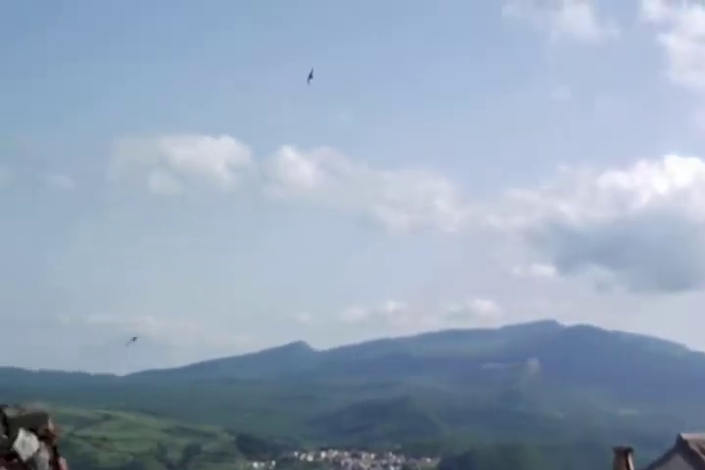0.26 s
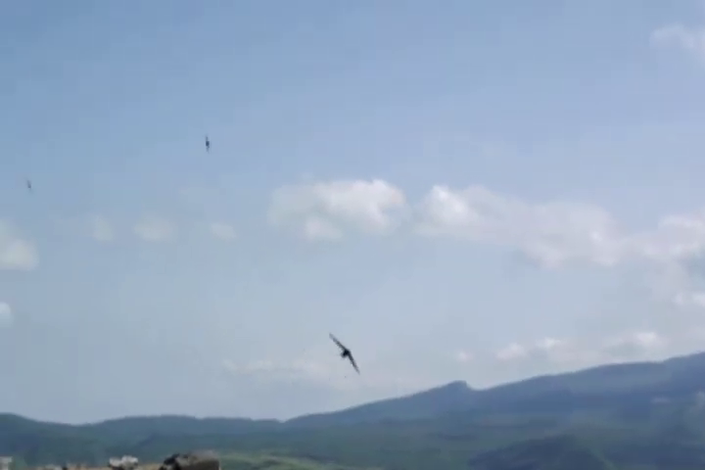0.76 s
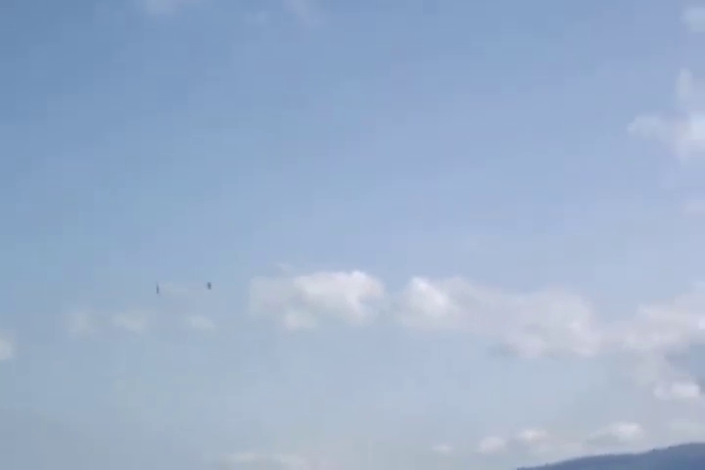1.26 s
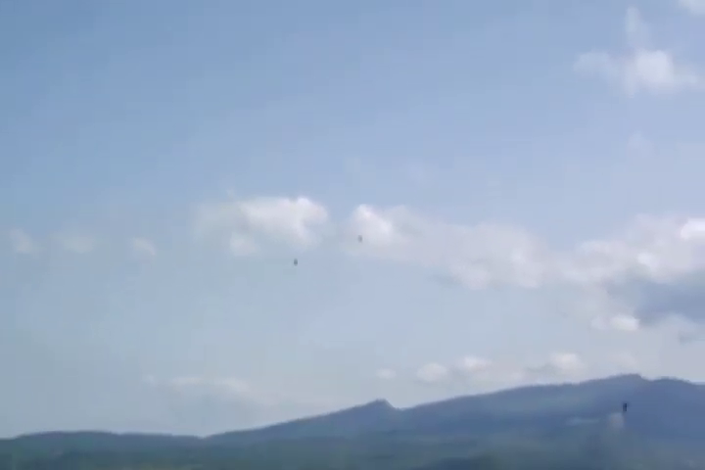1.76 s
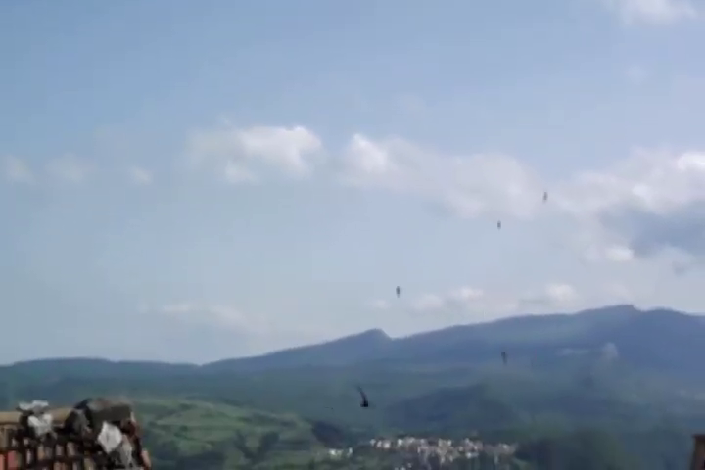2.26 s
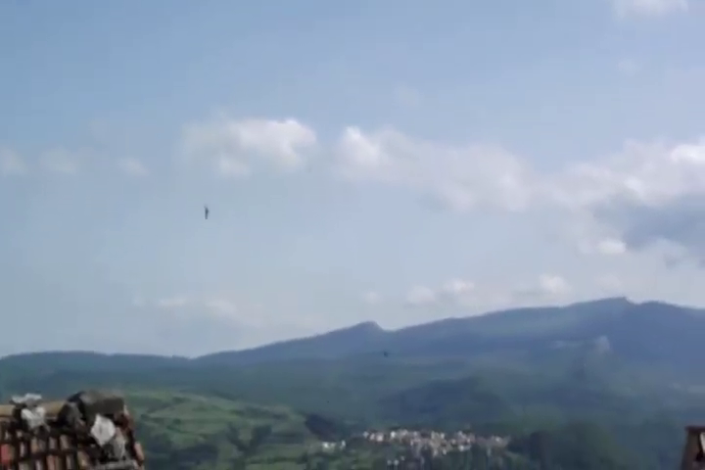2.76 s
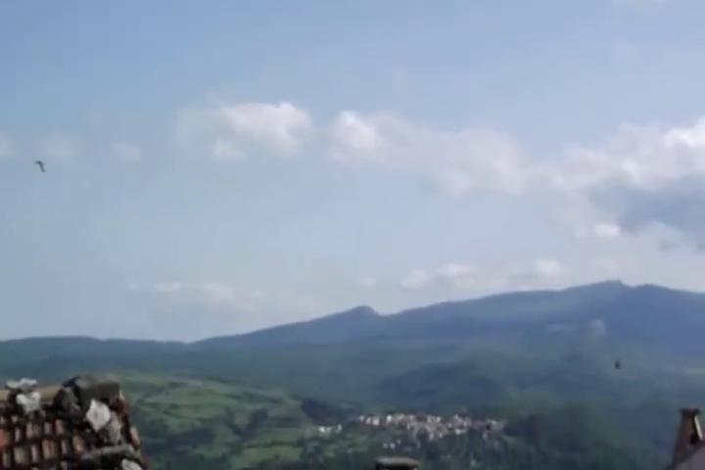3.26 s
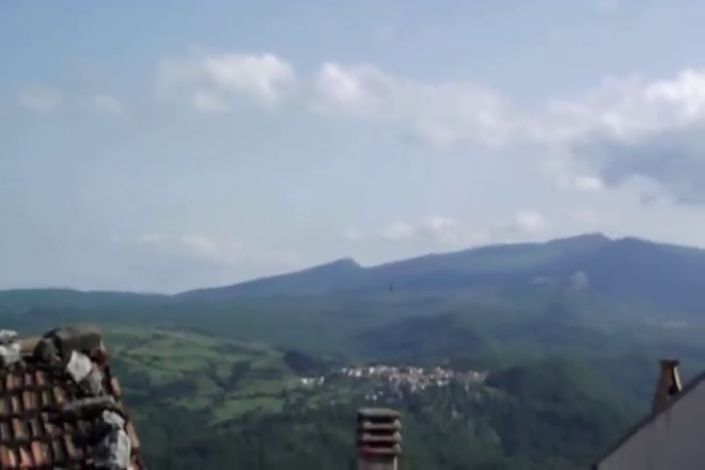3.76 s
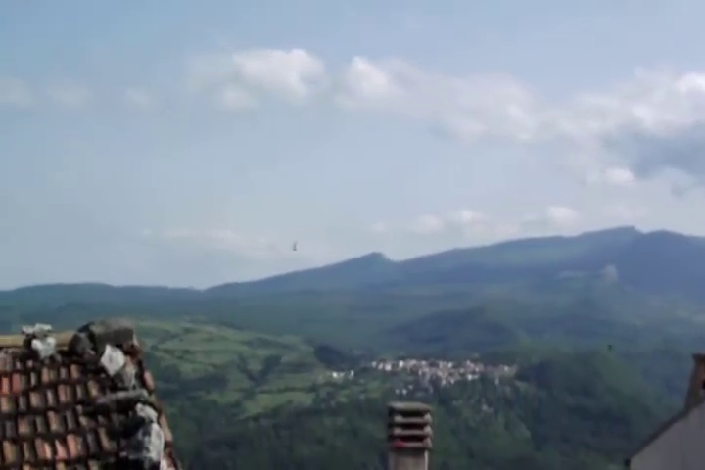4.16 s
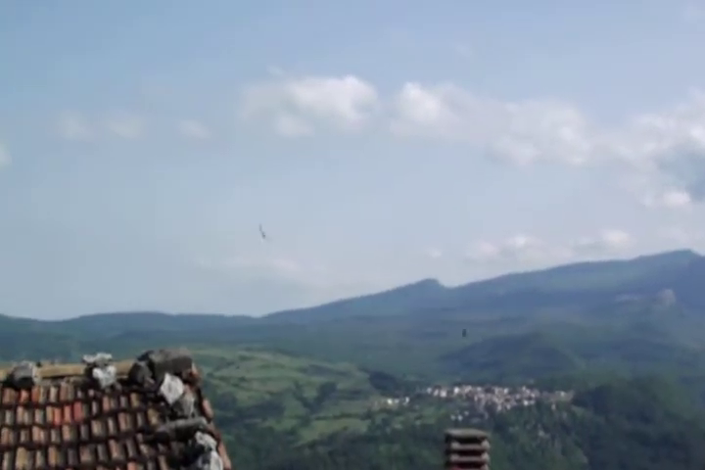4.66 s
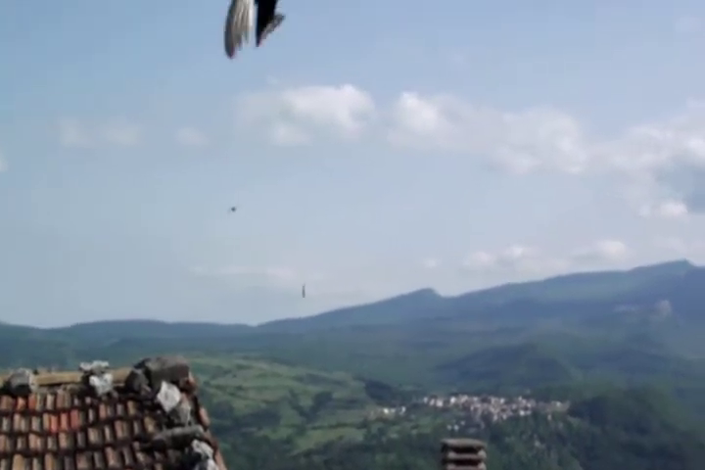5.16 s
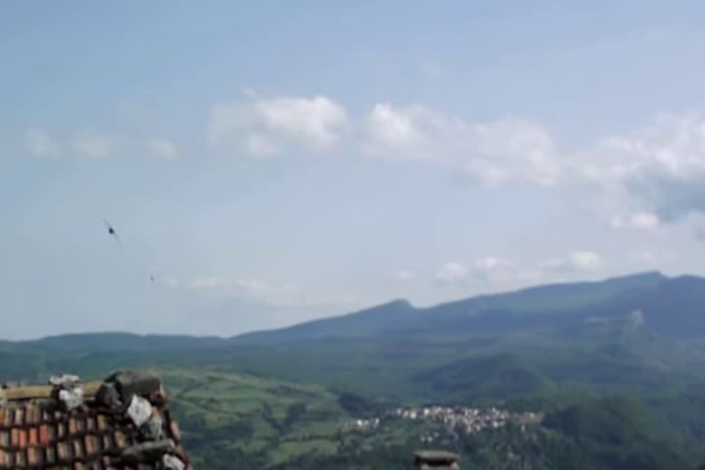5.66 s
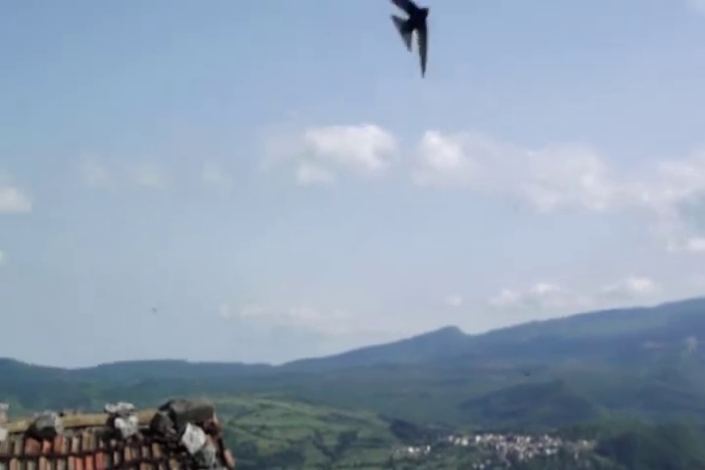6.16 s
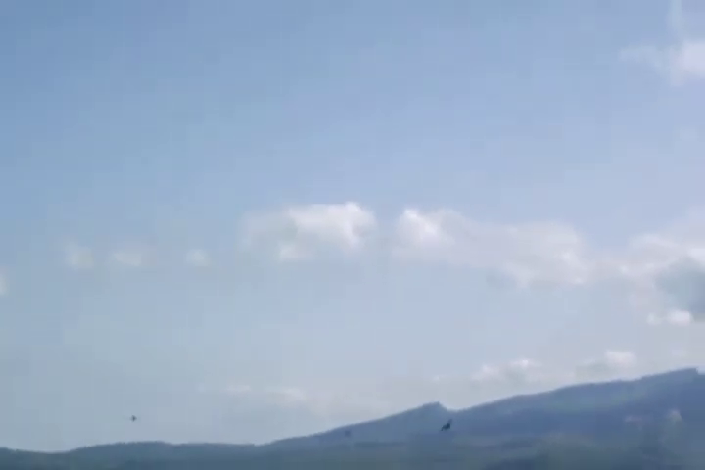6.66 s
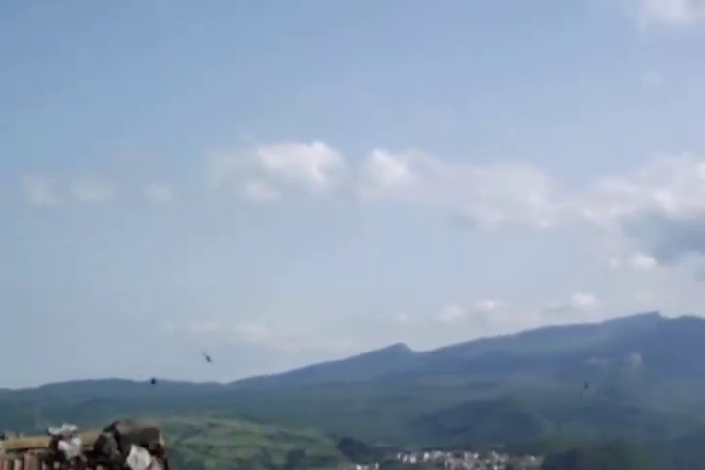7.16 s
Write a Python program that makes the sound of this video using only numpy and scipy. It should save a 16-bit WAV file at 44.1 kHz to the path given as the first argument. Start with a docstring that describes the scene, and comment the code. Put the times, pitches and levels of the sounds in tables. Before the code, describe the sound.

Outdoors above rooftops, steady camera hiss with small clicks and bumps, then one piercing, buzzing swallow scream mid-way and a few thin far chirps.

```python
"""Over the roofs of a hill town, swallows wheel. One sweeps close with a shrill two-voiced scream, pulsed into
a deepening buzz that breaks up into five short notes, lower and lower; others chirp farther off as warbled
tones. Decaying noise gives the roofs' answer and a delay the house front's. A small camera adds hollow filtered
hiss, whirr and hum, modal clicks and soft bumps; wind noise buffets the microphone, and the treble flickers."""
import sys
import numpy as np
from scipy import signal
from scipy.fft import rfft, irfft, next_fast_len
from scipy.io import wavfile
from scipy.ndimage import uniform_filter1d, map_coordinates

SR = 44100
rng = np.random.default_rng(int(sys.argv[2]) if len(sys.argv) > 2 else 0)


def output_pcm(signal):
    """Save a mono or channel-first signal as 16-bit PCM at the path in sys.argv[1].

    Samples are clipped to [-1, 1] before scaling.
    """
    pcm = np.clip(np.atleast_2d(signal).T, -1, 1) * 32767
    wavfile.write(sys.argv[1], SR, np.round(pcm).astype(np.int16))


N = 326781
TIME = np.arange(N) / SR


def amp(db):
    """Decibel law: level to amplitude gain."""
    return 10 ** (np.asarray(db) / 20)


def unit(x):
    """Power normalization: scales to rms 1."""
    return x / np.sqrt(np.mean(x ** 2) + 1e-20)


def along(points, hz):
    """Logarithmic frequency scale: interpolates (frequency [Hz], value) points."""
    f, v = np.transpose(points)
    return np.interp(np.log(hz + 1), np.log(f + 1), v)


def curves(rows):
    """Linear interpolation: one value per sample for each column after the time."""
    s, *cols = np.transpose(rows)
    return [np.interp(TIME, s, c) for c in cols]


def wobble(rate, size=N):
    """Band-limited random modulation: a smooth curve through `rate` random knots a second."""
    knots = rng.standard_normal(int(size * rate / SR) + 4)
    return map_coordinates(knots, [np.arange(size) * rate / SR])


def filtered(x, response):
    """Linear filtering: the spectrum of x times a response of frequency."""
    m = next_fast_len(N + SR // 2)
    return irfft(rfft(x, m) * response(np.fft.rfftfreq(m, 1 / SR)), m)[..., :N]


def noise(colour):
    """Spectral shaping: noise of rms 1 whose spectrum in dB follows colour(Hz)."""
    return unit(filtered(rng.standard_normal(N), lambda hz: amp(colour(hz))))


def phase(hz):
    """Frequency modulation: phase is the running integral of frequency."""
    return 2 * np.pi * np.cumsum(hz) / SR


def partial(angle, db):
    """Sinusoidal partial of the given rms level."""
    return np.sqrt(2) * amp(db) * np.sin(angle)


def gate(t, length, rise, fall):
    """Raised-sine envelope, open from 0 to length."""
    return np.sin(np.pi / 2 * np.clip(np.minimum(t / rise, (length - t) / fall), 0, 1)) ** 2


def swells(rows, rise, fall, sag_db=0):
    """Amplitude envelope: (start, length, level) events each rise, sag over their length and fall away."""
    gain = 0
    for s, length, db in rows:
        sagging = amp(db - sag_db * np.clip((TIME - s) / length, 0, 1))
        gain = gain + sagging * gate(TIME - s, length, rise, fall)
    return gain


def add(track, s, sound):
    """Superposition: mixes a sound into the track at time s."""
    part = track[max(round(s * SR), 0):][:len(sound)]
    part += sound[:len(part)]


def steady(g):
    """Power levelling: evens out the mean square of a pulse train over 20 ms."""
    return g / np.sqrt(np.abs(uniform_filter1d(g ** 2, SR // 50)) + 1e-3)


def grain(grain_db=3.5):
    """Random amplitude modulation of rms 1, which roughens a tone."""
    return unit(amp(grain_db * wobble(900)))


# Course of the scream's two voices, levels before pulsing: (time [s], whistle pitch [Hz],
# whistle fundamental level [dB], whistle octave level [dB], lower voice level [dB])
SCREAM_COURSE = [(3.922, 3950, -40, -36, -62), (3.942, 4800, -37, -34, -51),
                 (3.962, 5160, -37.5, -27.5, -35), (4.0, 5130, -31, -35, -42),
                 (4.029, 5140, -34, -37, -33.5), (4.072, 5290, -33.5, -36, -34),
                 (4.095, 5520, -35, -28, -28), (4.126, 5640, -30.5, -36, -25), (4.149, 5640, -30, -40, -30),
                 (4.176, 5690, -24, -29.5, -29.5), (4.243, 5790, -28.5, -41, -32),
                 (4.272, 5740, -19, -27, -34), (4.306, 5710, -18, -25, -29), (4.318, 5530, -16.5, -16, -37)]
# Moments when the lower voice breaks through: (centre time [s], length [s], level before pulsing [dB])
VOICE_BREAKS = [(4.0184, 0.011, -20), (4.083, 0.014, -17)]
FIRST_RATE, LAST_RATE = 335, 228  # mean pulses per s: the buzz slows through the scream
SHALLOW, DEEP, DEEPEN_AT_S, DEEPEN_S = 0.26, 1, 4.167, 0.041  # pulse depth 0-1 early and late, when, how fast
HARSH_AT_S, HARSH_WIDTH_S, HARSHEST, CLEANEST = 4.1, 0.102, 0.59, 0.096  # roughness 0-1 peaks in mid scream
LOW_HZ, LOW_RISE_HZ, RASP_DEPTH = 3710, 199, 0.5  # lower voice: fundamental, its rise, pulse depth 0-1
UNDERTONE_FROM_S, UNDERTONE_S = 4.013, 0.14  # its fundamental starts firmly, fades before the buzz deepens


def scream(sweep_hz=800, jitter_hz=260, low_jitter_hz=140, scatter_db=1.5, broken_db=7, snap_at=0.41,
           snap_width=0.11, snap_db=-11, undertone_db=-5, air_db=-11, fuzz_db=-9):
    """Two-voiced syrinx: amplitude and frequency modulation pulse a whistle and a grainy lower rasp."""
    pitch, first_db, octave_db, rasp_db = curves(SCREAM_COURSE)
    start, end = SCREAM_COURSE[0][0], SCREAM_COURSE[-1][0]
    progress = np.clip((TIME - start) / (end - start), 0, 1)
    rate = FIRST_RATE + (LAST_RATE - FIRST_RATE) * progress
    deepening = (1 + np.tanh((TIME - DEEPEN_AT_S) / DEEPEN_S / 2)) / 2
    depth = np.clip(SHALLOW + (DEEP - SHALLOW) * deepening, 0, 1)
    rough = CLEANEST + (HARSHEST - CLEANEST) * np.exp(-((TIME - HARSH_AT_S) / HARSH_WIDTH_S) ** 2)

    count = np.cumsum(rate * (1 + .04 * wobble(250)) * (TIME < end)) / SR
    cycle = (count - count[-1]) % 1  # the buzz ends on a whole pulse
    beat = np.sin(np.pi * cycle) ** 3.5
    snap = np.exp(-((cycle - snap_at) / snap_width) ** 2)  # bright moment just before the pulse's crest
    pulses = steady(1 - depth + depth * beat) * amp(scatter_db * wobble(200))
    snaps = steady(1 - depth + depth * (beat + 2 * snap) / 2) * amp(scatter_db * wobble(200))

    # the pitch climbs fast at a pulse's edges and lingers in its middle
    swing = 2 * cycle - 1
    pitch = pitch + 75 * depth * wobble(400)
    sweep = sweep_hz * depth * (0.19 * swing + swing * np.abs(swing))
    angle = phase(pitch + sweep + jitter_hz * rough * wobble(1800))
    whistle = pulses * partial(angle, first_db + broken_db * rough * wobble(450))
    whistle += snaps * partial(2 * angle, octave_db + 2.8 * wobble(550))
    fuzzy = angle + phase(300 * wobble(1500))
    whistle += pulses * depth * wobble(900) * partial(fuzzy, first_db + fuzz_db)
    halfway = angle + angle / 2 + phase(300 * wobble(1500))  # between fundamental and octave
    whistle += steady(snap) * depth ** 2 * partial(halfway, first_db + snap_db)

    # the lower voice sounds mostly at its octave, with an undertone and breath noise
    low = phase(LOW_HZ + LOW_RISE_HZ * progress ** 2 + low_jitter_hz * wobble(900))
    blurred = low + phase(220 * wobble(1200))
    undertone = grain() * partial(blurred, rasp_db + undertone_db)
    undertone *= gate(TIME - UNDERTONE_FROM_S, UNDERTONE_S, .004, 0.12)
    rasp = grain() * partial(2 * low, rasp_db) + undertone
    breath = [(2000, -20), (3600, -6.5), (6000, -12), (9000, 2.5), (11000, -2.0), (12500, -5), (14000, -40)]
    rasp += amp(rasp_db + air_db + 11.4 * depth) * noise(lambda hz: along(breath, hz))
    rasp *= steady(1 - RASP_DEPTH + RASP_DEPTH * beat)

    # twice it pushes the whistle aside with hard pulses
    for s, length, db in VOICE_BREAKS:
        burst = gate(TIME - s + length / 2, length, 0.0039, 0.0027)
        rasp += burst * ((0.26 + 1.1 * beat) * partial(2 * low, db) + partial(low, db - 16))
        whistle *= 1 - 0.53 * burst
    return (whistle + rasp) * gate(TIME - start, end - start, 0.0017, .0005)


# Notes that close the scream: (time [s], length [s], start pitch [Hz], end pitch [Hz],
# fundamental level before flutter [dB], rasp level re fundamental [dB], flutter [0-1])
CLOSING_NOTES = [(4.3305, 0.0082, 5520, 5370, -12, 2, .15), (4.3521, 0.0057, 5020, 5270, -12, -10, 0.3),
                 (4.374, 0.0085, 4930, 5140, -15.5, -8, 0.64), (4.3965, 0.0082, 4280, 4900, -15, -9, 0.5),
                 (4.4214, 0.0049, 4350, 3440, -13.5, -12, 0.2)]


def closing_notes(jitter_hz=190, octave_db=-0.5, flutter_hz=900, attack_s=0.00089, release_share=0.68):
    """Frequency-modulated harmonic tones: notes of milliseconds start hard, glide, flutter and fade."""
    out = np.zeros(N)
    for s, length, start_hz, end_hz, db, rasp_db, rough in CLOSING_NOTES:
        t = np.arange(int(length * SR)) / SR
        flutter = rough * np.sin(phase(flutter_hz * (1 + 0.27 * wobble(830, len(t)))))
        glide = end_hz + (start_hz - end_hz) * (1 - t / length) ** 2
        angle = phase(glide + 500 * flutter + jitter_hz * wobble(2900, len(t)))
        # alternate cycles differ more and more
        halfway = angle + angle / 2 + phase(250 * wobble(1860, len(t)))
        note = partial(angle, db) + partial(2 * angle, db + octave_db)
        note += 2 * t / length * partial(halfway, db + rasp_db)
        note += partial(3 * angle, db - 6)
        add(out, s, note * (1 + flutter / 2) * gate(t, length, attack_s, release_share * length))
    return out


# Calls of the farther birds: (time [s], length [s], pitch [Hz], opening rise [0-1],
# closing sag [0-1], octave level [dB])
FAR_CHIRPS = [(3.697, 0.094, 4410, 0.17, 0.06, -37.5), (3.767, 0.08, 4270, 0.04, 0.08, -49),
              (3.956, 0.038, 5040, 0.3, 0.1, -38), (5.196, .014, 4430, 0.02, 0.1, -48),
              (5.24, .008, 4360, .1, 0, -54), (5.459, .008, 4500, 0.04, 0, -47),
              (6.939, 0.029, 4050, 0.02, 0, -37), (7.24, 0.021, 3940, 0, 0.01, -35),
              (7.264, 0.032, 4250, 0.03, 0.05, -47), (7.3, 0.033, 4210, 0, 0.07, -45.5)]


def chirps(warble_rate=185, warble_hz=95, rise_time=0.018):
    """Vibrato on a gliding harmonic tone: thin calls slide up, may sag, and are strongest at the octave."""
    out = np.zeros(N)
    for s, length, hz, rise, sag, db in FAR_CHIRPS:
        t = np.arange(int(length * SR)) / SR
        warble = warble_hz * (np.sin(2 * np.pi * warble_rate * t) + 0.35 * wobble(720, len(t)))
        glide = hz * (1 - rise * np.exp(-t / rise_time) - sag * (t / length) ** 2)
        angle = phase(glide + warble)
        call = partial(2 * angle, db) + partial(angle, db - 7.0) + partial(3 * angle, db - 21)
        add(out, s, call * gate(t, length, length * 0.16, length * 0.28))
    return out


# Reverberation of tiles and walls: (frequency [Hz], decay by 60 dB [s])
ROOF_DECAY = [(500, 0.5), (3800, 0.25), (8000, 0.29), (13000, 0.21)]


def roofs(x, wet_db=-15, delay=.012, tilt_db=-2.5):
    """Diffuse reverberation: convolution with decaying noise, duller than the call."""
    hz, t, z = signal.stft(rng.standard_normal(SR // 2), SR, nperseg=256)
    colour_db = tilt_db * np.log2(np.maximum(hz, 3500) / 6000)
    decay_db = -60 * t / along(ROOF_DECAY, hz)[:, None]
    tail = signal.istft(z * amp(colour_db[:, None] + decay_db), SR, nperseg=256)[1]
    tail *= 1 - np.exp(-np.arange(len(tail)) / SR / delay)  # gradual build-up
    return amp(wet_db) * signal.fftconvolve(x, tail / np.linalg.norm(tail))[:N]


def wall(x, delay=0.022, echo_db=-22):
    """Specular reflection: one distinct, delayed and dull echo from a house front."""
    return amp(echo_db) * filtered(x, lambda hz: np.exp(-2j * np.pi * hz * delay) / (1 + (hz / 9000) ** 2))


# Taps on the camera body: (time [s], relative level [dB], brightness [dB per octave],
# favoured frequency [Hz], second favoured frequency [Hz])
BODY_TAPS = [(0.125, -41, 0, 1850, 1450), (0.147, -39, 3, 1850, 1450), (0.2387, -21, 4.5, 3430, 1964),
             (.4850, -25, -5.5, 1050, 2060), (0.6133, -38, -10, 1430, 780), (0.6981, -19, -2.5, 1880, 2380),
             (2.125, -39.5, -15, 835, 1580)]
# Modes of the camera body: (frequency [Hz], relative level [dB], decay by 60 dB [s])
BODY_MODES = [(780, -18, 0.017), (1077, -18, 0.035), (1420, -5.5, 0.024), (1836, -7, 0.017),
              (2060, -11, 0.016), (2370, -14.5, 0.021), (2740, -5.5, 0.015), (3080, -6, 0.015),
              (3540, -9, 0.011), (4500, -13, 0.014), (7100, -14, .01), (10000, -15, 0.0089)]


def clicks(crack_hz=3500, crack_db=-6, favour_db=12, favour_octaves=0.12):
    """Modal excitation: taps ring the camera body, each spot favouring two regions, with a noisy contact."""
    out, t = np.zeros(N), np.arange(SR // 20) / SR
    for s, db, tilt_db, main_hz, second_hz in BODY_TAPS:
        ring = 0
        for k, (hz, level, t60) in enumerate(BODY_MODES):
            nearness = sum(np.exp(-(np.log2(hz / spot) / favour_octaves) ** 2) for spot in (main_hz, second_hz))
            mode_db = level + favour_db * nearness + tilt_db * np.log2(hz / 1800)
            ring = ring + (-1) ** k * amp(mode_db - 60 * t / t60) * np.sin(2 * np.pi * hz * t)
        top_hz = np.clip(crack_hz * amp(tilt_db + 5), 1800, 12000)  # brighter taps crack higher
        contact = signal.butter(3, [1200, top_hz], "band", fs=SR)
        envelope = amp(crack_db - 60 * t / 0.028) * np.minimum(t / 0.00067, 1)
        crack = signal.lfilter(*contact, envelope * rng.standard_normal(len(t)))
        add(out, s, amp(db) * (ring + crack) * (1 - np.exp(-t / .0004)))
    return out


# Shifts of the grip: (time [s], relative level [dB])
GRIP_BUMPS = [(1.291, -36), (1.453, -34), (1.702, -34), (1.797, -37), (1.875, -32), (1.913, -32),
              (1.994, -31.5), (2.079, -31), (2.123, -36), (2.69, -36), (3.359, -31), (3.427, -32.5),
              (4.698, -32.5), (6.347, -32.5), (6.758, -32), (6.839, -30)]


def bumps(thud_hz=165, width=0.0011, lag=0.0146):
    """Impulsive excitation: each shift of the grip gives one soft low push, a Gaussian-windowed cosine."""
    out, t = np.zeros(N), np.arange(SR // 20) / SR - lag
    for (s, db), chance in zip(GRIP_BUMPS, rng.standard_normal(len(GRIP_BUMPS))):
        thud = np.cos(2 * np.pi * thud_hz * np.exp(.15 * chance) * t)
        add(out, s, amp(db + 2.5) * thud * np.exp(-(t / width) ** 2 / 2))
    return out


# Spells of treble flicker: (time [s], length [s], level at onset [dB])
FLICKER_SPELLS = [(2.52, 0.23, -48), (4.45, 1.2, -48.5), (5.92, 0.38, -48)]


def flicker():
    """Random amplitude modulation: a thin, restless treble haze in spells, the longest after the scream."""
    colour = [(2500, -30), (4000, 4), (6000, 3), (8000, 0), (10500, -4), (13000, -28)]
    haze = noise(lambda hz: along(colour, hz))
    restless = unit(amp(6.6 * np.tanh(wobble(160))) * haze)
    return swells(FLICKER_SPELLS, rise=0.089, fall=0.21, sag_db=4.0) * restless


# Gusts on the microphone: (time [s], length [s], level at onset [dB])
WIND_GUSTS = [(0.34, 0.17, -43), (0.43, 0.3, -39.5), (0.92, 1.35, -49.5), (3.72, 0.34, -38),
              (4.4, 0.225, -43), (4.68, 0.28, -43), (5.42, .11, -44.5)]
# Spectrum of the buffeting: (frequency [Hz], relative density [dB per Hz])
BUFFET_SPECTRUM = [(21, -38), (35, -16), (71, -4.5), (91, -0.5), (254, -12), (287, -17), (428, -21.5),
                   (500, -30), (650, -51), (1100, -120)]
CALM_DB, GUST_RISE_S, GUST_FALL_S, GUST_SAG_DB = -59, 0.053, 0.064, 6.5  # level between gusts; gust shape


def wind():
    """Turbulent pressure fluctuation: low noise buffets the microphone in uneven lumps."""
    strength = np.hypot(amp(CALM_DB), swells(WIND_GUSTS, GUST_RISE_S, GUST_FALL_S, GUST_SAG_DB))
    return strength * unit(amp(1.6 * wobble(30)) * noise(lambda hz: along(BUFFET_SPECTRUM, hz)))


# Spectrum of the hiss: (frequency [Hz], relative density [dB per Hz])
HISS_SPECTRUM = [(20, -1), (60, 0), (270, 2), (500, -1.5), (750, -4), (2100, -6), (3300, 0), (4250, -3.5),
                 (5200, -12), (7000, -8.5), (8700, -18.5), (10500, -17), (12300, -20.5), (15500, -24.5)]
# Hollow resonances of the housing that colour it: (frequency [Hz], width [Hz], boost [dB])
HOUSING_RESONANCES = [(917, 84, 3.5), (1195, 81, 6.5), (1386, 56, 8), (1573, 41, 9), (1819, 113, 11.5),
                      (2447, 175, 8), (2747, 27, 5.5), (3065, 130, 4.5), (3600, 223, 5), (4766, 246, 8.5),
                      (5730, 360, 8.5), (6530, 280, 2.5), (7540, 205, 8), (9600, 540, 11.5),
                      (11480, 270, 5)]
# Swells of the whirr: (time [s], length [s], level [dB])
WHIRR_SWELLS = [(-0.2, .62, -47.5), (1.65, .5, -50), (6.3, 1.8, -50)]
# Swells of the wavering band: (time [s], length [s], level [dB])
WAVER_SWELLS = [(2.0, 0.44, -53), (3.0, .65, -57)]
# Nearly steady tones of the camera: (frequency [Hz], level [dB])
HUM_TONES = [(31, -59), (8010, -74), (11364, -75)]
HISS_DB = -42


def hiss(whirr_rest_db=-61, waver_rest_db=-60, swell_s=0.24):
    """Resonant colouring of noise: hollow hiss, a swelling whirr, a wavering band below it, and faint hum."""
    def hollow(hz):
        """Resonance curves: the housing's peaks on the hiss spectrum, in dB."""
        peaks = sum(db * np.exp(-((hz - centre) / width) ** 2) for centre, width, db in HOUSING_RESONANCES)
        return along(HISS_SPECTRUM, hz) + peaks

    air = amp(HISS_DB + 0.5 * wobble(7.4)) * noise(hollow)
    unsteady = amp(wobble(12))
    whirr_band = [(1350, -53), (1600, -7), (1740, -2.0), (1870, -2.0), (2050, -39)]
    whirr = unsteady * noise(lambda hz: along(whirr_band, hz))
    whirr *= np.hypot(amp(whirr_rest_db), swells(WHIRR_SWELLS, swell_s, swell_s))
    waver_band = [(1300, -46), (1410, 2.0), (1470, 1.5), (1520, -15), (1590, -6), (1700, -46)]
    waver = amp(3.2 * wobble(12)) * noise(lambda hz: along(waver_band, hz))
    waver *= np.hypot(amp(waver_rest_db), swells(WAVER_SWELLS, swell_s, swell_s))
    hum = sum(partial(phase(hz + 1.0 * wobble(5)), db) for hz, db in HUM_TONES)
    return air + whirr + waver + hum


def scene():
    """Superposition at one microphone, where birds and clicks lose their treble above the birds' octave."""
    near, far = scream() + closing_notes(), chirps()
    birds = near + wall(near) + roofs(near, wet_db=-13.0, delay=0.0012, tilt_db=-7.0)
    birds += far + roofs(far, wet_db=-6.5, delay=0.021, tilt_db=-8.5)
    response = [(11700, 0.5), (12400, -10), (13100, -18), (16000, -16)]  # (frequency [Hz], gain [dB])
    bright = filtered(birds + clicks(), lambda hz: amp(along(response, hz)))
    mono = bright + flicker() + bumps() + wind() + hiss()
    return np.array([mono, mono])


TOP_HZ = 15850


def record(dry, knee_db=-20, squeeze=0.59):
    """Compression and band-limiting: gain drops at loud notes; the left channel lags by one sample."""
    power = signal.lfilter([1 / (0.04 * SR)], [1, 1 / (0.044 * SR) - 1], dry[0] ** 2)
    gain = np.maximum(np.sqrt(power) / amp(knee_db), 1) ** -squeeze
    lag = np.array([[1], [0]])  # samples, left and right
    return filtered(dry * gain, lambda hz: (hz < TOP_HZ) * np.exp(-2j * np.pi * hz / SR * lag))


dry = scene()
out = record(dry)
output_pcm(out)
```